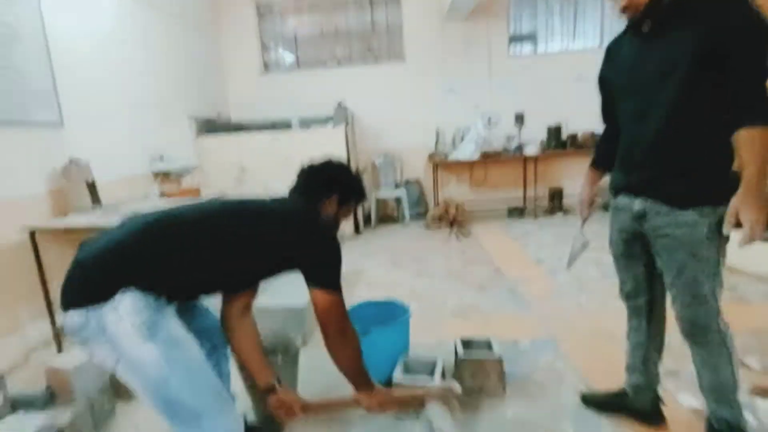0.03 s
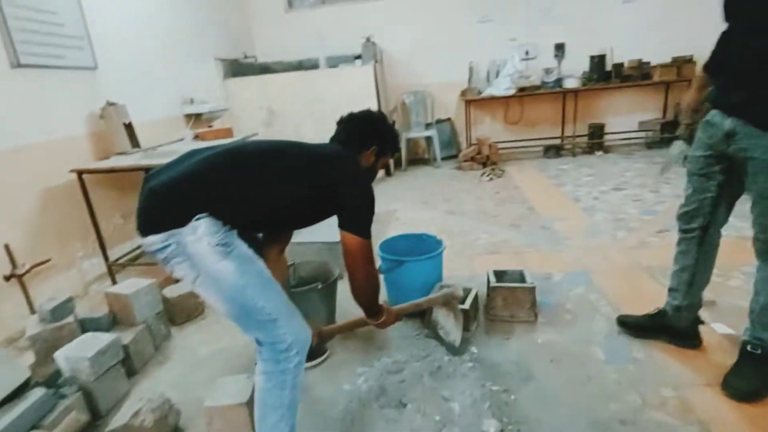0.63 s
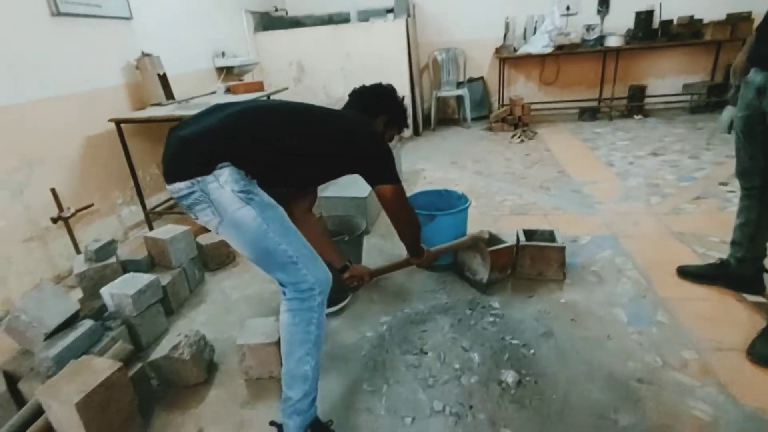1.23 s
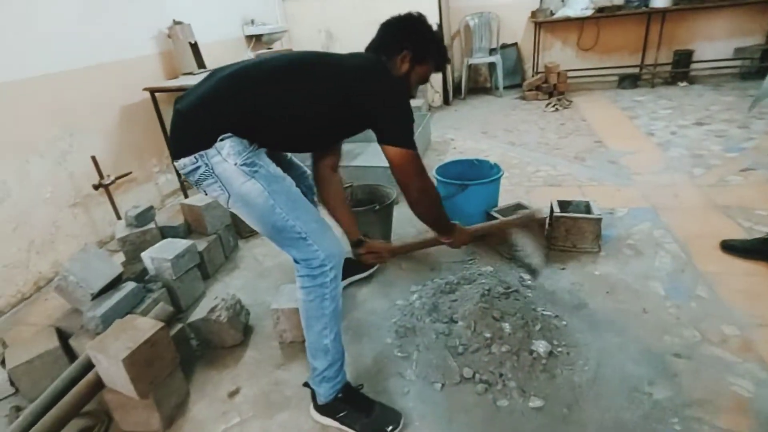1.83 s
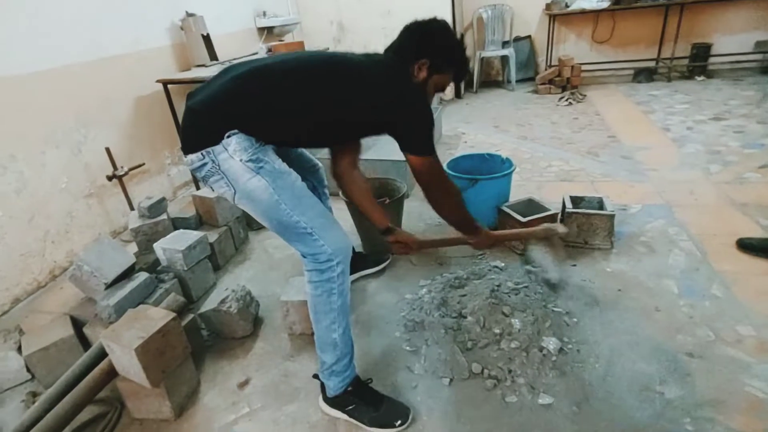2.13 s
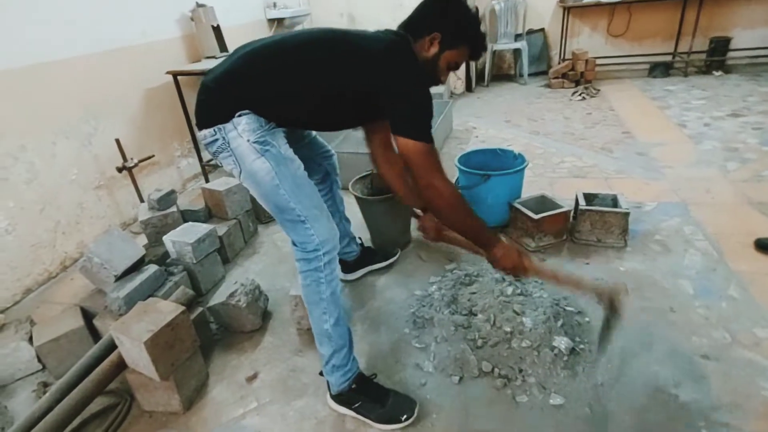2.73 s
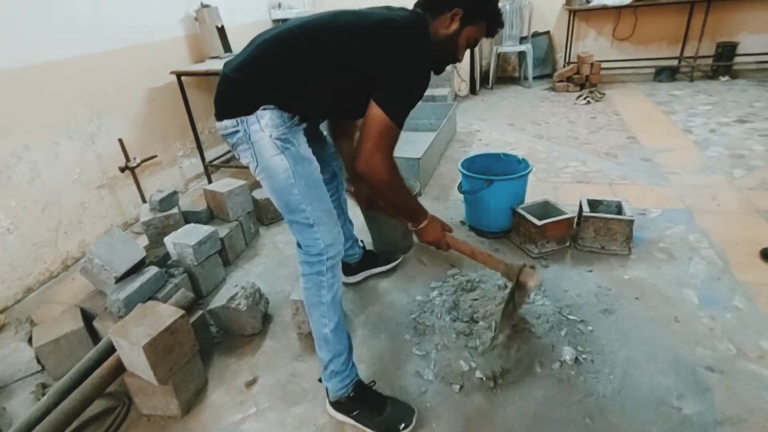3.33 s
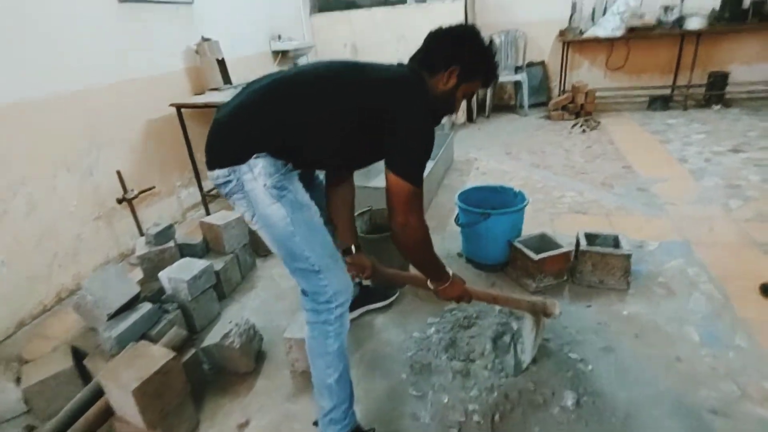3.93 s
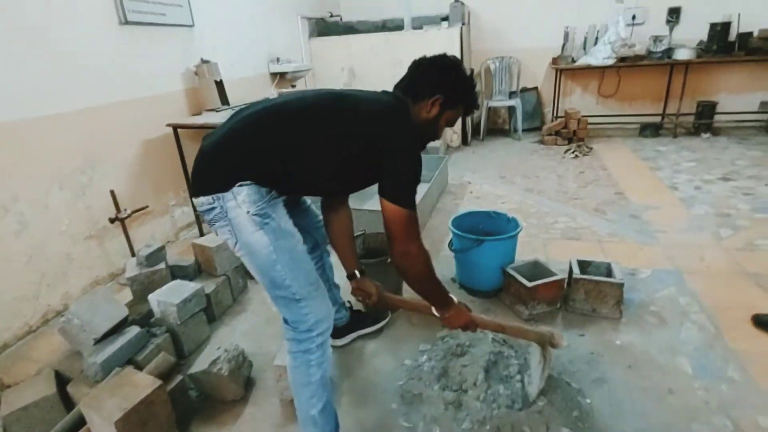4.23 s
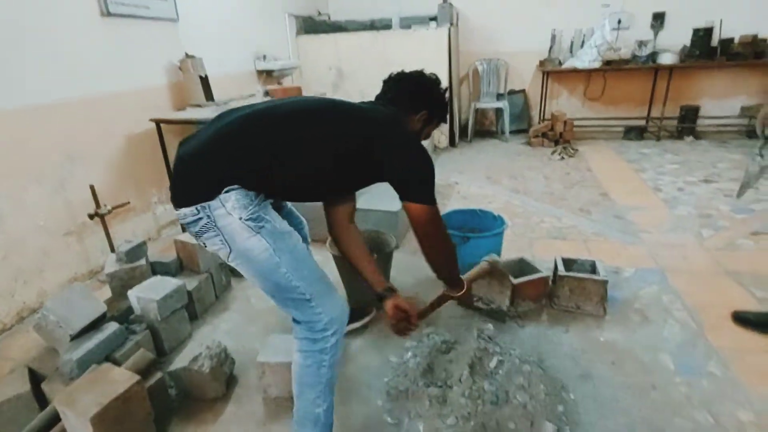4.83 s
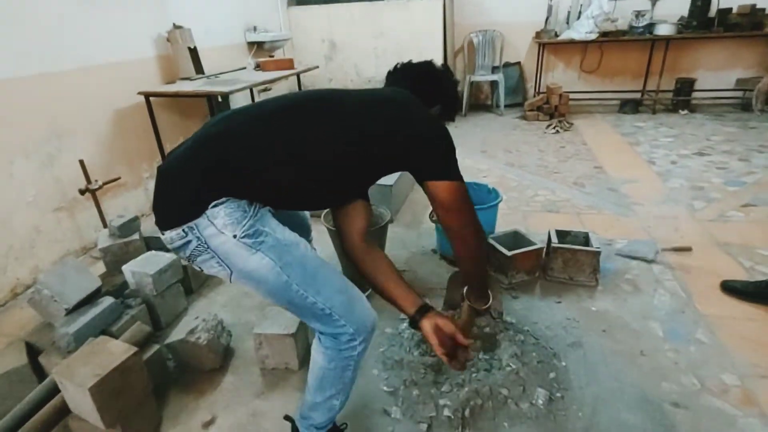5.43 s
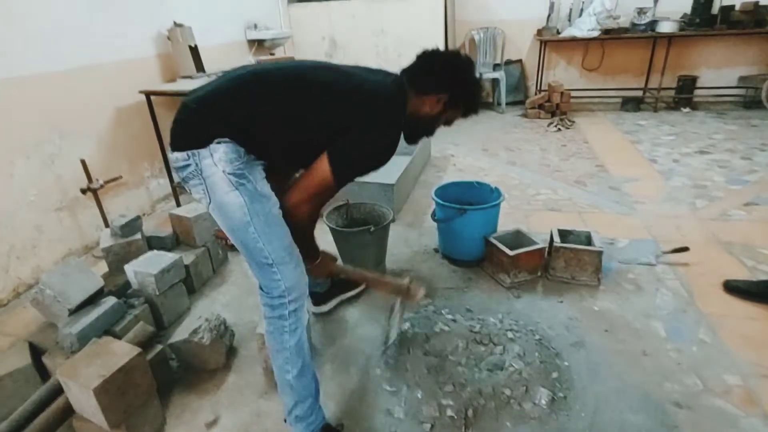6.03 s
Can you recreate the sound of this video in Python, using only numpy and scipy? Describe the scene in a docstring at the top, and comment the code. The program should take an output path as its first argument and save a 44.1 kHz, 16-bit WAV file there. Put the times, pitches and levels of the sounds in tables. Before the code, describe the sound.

A long-handled steel blade works a pile of gravel and cement on a concrete floor, each stroke a knock followed by a gritty crunch. One longer scrape comes early, then shorter strokes that grow softer, a lull, and a last strong dig. Near the end a metal trowel bounces across the floor, its plate ringing. The hard-walled room echoes around everything, over steady background noise and a faint deep rumble.

```python
"""In a bare, reverberant lab, a long-handled steel blade is struck into a heap of broken stone and
cement and dragged over the concrete floor. Each stroke knocks, then crunches as grains collide:
stones rumble, gravel rasps and sand hisses through the blade's resonances, and pinched chips chirp.
Grit slides off the lifted blade. Near the end a tossed trowel lands and skitters, its plate ringing.
A steady background noise and a faint, deep rumble lie underneath."""
import sys
import numpy as np
from scipy import signal
from scipy.fft import rfft, irfft, next_fast_len
from scipy.io import wavfile

SR = 44100
rng = np.random.default_rng(int(sys.argv[2]) if len(sys.argv) > 2 else 0)


def unload_wav(signal):
    """Save mono or channel-first audio to the path in sys.argv[1] as 16-bit WAV at rate SR, clipped to [-1, 1]."""
    wavfile.write(
        sys.argv[1],
        SR,
        np.round(np.clip(np.atleast_2d(signal).T, -1, 1) * 32767).astype(np.int16),
    )


N = 267554
LEAD = SR // 4   # samples before time zero, where the first stroke begins
TIME = np.arange(-LEAD, N) / SR
SIZE = next_fast_len(len(TIME) + 2 * SR, True)
HZ = np.maximum(np.arange(SIZE // 2 + 1) * SR / SIZE, 1)
LOW_SPLIT_HZ, HIGH_SPLIT_HZ = 700, 3500   # between the low (stones), middle (gravel), high (sand) bands
DRAG_START_S = 0.559

# strokes into the heap: (touch [s], bite [s], push length [s], skim weaker by [dB], settling [dB/s],
# stones [dB], gravel [dB], sand [dB])
DIGS = [(-0.15, -0.096, .26, -13, 99, -24, -19.5, -25), (1.627, 1.631, 0.064, 0.5, 101, -35.5, -22, -23.5),
        (2.123, 2.176, 0.1, 12.5, 130.5, -20, -15.5, -19), (2.97, 3.03, 0.057, 4, 185, -32, -22, -25),
        (3.639, 3.666, 0.11, 9, 225, -45, -35, -36), (4.997, 5.137, 0.081, 18.5, 80, -26, -17, -19.5)]
# grit sliding off the blade after the fifth stroke: one row, columns as in DIGS
SPILL = (3.96, 4.0, .04, 6, 45, -53, -52, -53)
# the trowel's impacts on the floor: (time [s], low [dB], middle [dB], high [dB], ring [dB])
BOUNCES = [(5.481, -20, -9, -11.5, -42), (5.515, -14, -4, -10.5, -37), (5.529, -34.5, -5.5, -21, -38),
           (5.562, -21, -16, -17, -44), (5.807, -13, -12.5, -9.5, -34), (5.8626, -27, -11, -7.5, -21),
           (5.878, -25, -19, -8, -26.5), (5.893, -25.5, -22, -13.5, -24), (5.911, -32, -30, -37, -40),
           (5.97, -20, -4.5, -22, -20.5), (5.985, -37, -14, -31, -28), (6.035, -23, -17, -35, -20),
           (6.055, -37, -13, -32, -39)]


def digging(strokes):
    """Source and filter: grains and knocks excite the blade, whose depth in the heap sets the colour."""
    # blade in the heap: (resonance [Hz], width [Hz], lift [dB])
    resonances = [(404, 79, -3.5), (470, 22, -6), (697, 48, 4.5), (1194, 120, 3), (1692, 15, 6),
                  (2053, 35, 6.5), (2210, 22, 2.5), (3330, 62, 3), (3650, 22, 3.5), (4010, 24, 9),
                  (4440, 120, 4.5), (4670, 90, 2), (4983, 100, 9), (6100, 110, 8), (6570, 39, 10.5),
                  (6700, 98, -16.5), (7700, 55, 3.5), (7800, 77, 4.5), (9430, 90, 6.5), (9830, 78, -11.5),
                  (10240, 52.3, 1)]
    # one spectral envelope per stroke: (frequency [Hz], level [dB])
    colours = [
        [(29, -61.5), (50, -26), (128, -11), (389, -4), (428, 4), (520, -4.5), (2560, -13.5), (2750, -14),
         (3850, -10), (5530, -15.5), (7760, -16), (16000, -28)],
        [(29, -54.5), (50, -26), (258, -10), (418, -10), (1050, -3), (1210, 1), (1400, -2.5), (1700, 1.5),
         (4900, -3), (8540, -10), (11700, -13), (16000, -26)],
        [(29, -63), (50, -31), (213, -9.5), (321, -8), (461, 0.5), (572, -8.5), (1150, -11), (1430, -12.5),
         (3100, -14), (4950, -14.5), (5500, -20), (9640, -16.5), (16000, -26.5)],
        [(29, -48), (50, -26), (85, -5.5), (495, 2.5), (615, -6.5), (884, -5.5), (997, -11), (1580, -6),
         (1870, -6.5), (3760, -9.5), (9640, 10.5), (16000, -9.5)],
        [(29, -44), (50, -21), (85, -6.5), (114, -11), (167, -1), (291, -5), (822, -12.5), (1070, -6),
         (4670, -5), (16000, -22)],
        [(29, -49), (50, -15), (75, -18), (240, -4.5), (362, -4), (450, 4), (572, -6), (1330, -4.5),
         (2270, -3.5), (2950, -2.5), (6550, -5.5), (16000, -14)],
    ]
    blade = resonance_gain(resonances)
    return sum(excite(body(colour, blade), gains, knocks_from(row[0]),
                      scrape_db=-0.5, hit_db=0.0, crush_s=0.0046)
               for row, gains, colour in zip(DIGS, strokes, colours))


def dragging(gains):
    """Sliding friction drives the blade, whose resonances shift when it is pressed on the floor."""
    # pressed blade: (resonance [Hz], width [Hz], lift [dB])
    resonances = [(300, 33, 2.5), (413, 12, 1.5), (505.3, 12, 8), (544, 29, 6.5), (590, 15, 0),
                  (789, 60, 1.5), (840, 50, 3.5), (952, 18, 4.5), (1400, 114, -5.5), (2280, 28, 6.5),
                  (2686, 80, 2.5), (3410, 25.2, 7.5), (5000, 170, 5), (6180, 200, 3.5)]
    # spectral envelope of the contact: (frequency [Hz], level [dB])
    colour = [(29, -74), (50, -23.5), (208, -12.5), (418, 4), (532, -1.5), (661, -4), (822, -1.5),
              (1070, -9), (1430, 0), (1620, -6.5), (3030, -13), (5150, -15), (11700, -24.5), (12600, -22),
              (16000, -30.5)]
    blade = body(colour, resonance_gain(resonances))
    return excite(blade, gains, knocks_from(DRAG_START_S), scrape_db=-1.0, hit_db=-2.5, crush_s=0.0036)


def spilling(gains):
    """Small impacts: falling grit excites the heap, without the blade's resonances."""
    # spectral envelope of the landing grit: (frequency [Hz], level [dB])
    colour = [(29, -39.5), (60, -13), (170, -3), (800, 4), (2400, 6), (4500, -6.5), (5400, -1.5), (6050, 1),
              (7500, -12), (11000, -19), (13000, -15), (16000, -12.5)]
    return excite(body(colour, 1), gains, knocks_from(SPILL[0]),
                  scrape_db=-0.5, hit_db=1.5, crush_s=0.0031)


def chips(sand, per_s=85, level_db=2.5, spread_db=3.5, t60_s=0.018, low_hz=3600, high_hz=13000):
    """Damped oscillation: stones pinched under the edge chirp, each at a rough pitch of its own."""
    draws = rng.random((1500, 4))
    starts = (np.cumsum(-np.log(1 - draws[:, 0])) / per_s * SR).astype(int)
    out, age = np.zeros(SIZE), np.arange(SR // 20) / SR
    decay = np.exp(-np.log(1000) * age / t60_s)
    chatter_rad = 0.76 * np.resize(drift(900), SIZE)
    for start, (_, pitch, strength, phase) in zip(starts[starts < len(TIME)], draws):
        hz = low_hz * (high_hz / low_hz) ** pitch
        span = slice(start, start + len(age))
        chip_db = level_db + spread_db * min(-np.log(1 - strength), 2)
        gain = sand[start] * from_db(chip_db) * np.sqrt(low_hz / hz)   # small stones: higher, weaker
        out[span] += gain * np.sin(2 * np.pi * (hz * age + phase) + chatter_rad[span]) * decay
    return rfft(out)


def trowel_skitter():
    """Forced vibration: impacts and sliding friction drive the trowel while it touches the floor."""
    # slides after landing: columns as in DIGS
    slides = [(5.487, 5.51, 0.054, 2, 170, -46, -21.5, -24), (5.806, 5.856, .2, 7, 100, -42.5, -49, -33.5)]
    # plate in contact: (resonance [Hz], width [Hz], lift [dB])
    resonances = [(660, 60, 3.5), (1330, 17, 2), (1700, 14, -1), (2220, 91, 3), (2570, 59, 9),
                  (3360, 320, 13), (3360, 25, -9), (4010, 130, 15.5), (4700, 15, 0), (5740, 75, 1),
                  (6130, 54, 7), (7950, 59, 1), (8420, 35, 9.5)]
    # spectral envelope of the contact: (frequency [Hz], level [dB])
    colour = [(47, -50), (80, -32.5), (422, -11.5), (482, -6.5), (1280, -8.5), (2130, -7), (2540, -3.5),
              (2840, -11), (4050, -16), (4730, -7), (9610, -12.5), (10500, -10.5), (16000, -26)]
    plate = body(colour, resonance_gain(resonances))
    return excite(plate, sum(map(stroke_gains, slides)), BOUNCES,
                  scrape_db=0.0, hit_db=1.0, crush_s=0.0025)


def trowel_ring():
    """Free vibration: each bounce sets the plate ringing; a dull contact leaves the upper modes weak."""
    # modes of the thin plate: (frequency [Hz], level [dB], t60 [s])
    modes = [(2570, 3.5, 0.36), (2336, -6, 0.26), (2420, -8, .25), (3300, -19, .25), (4015, -10, .2),
             (5717, -18, 0.16), (6160, -26, .2), (7822, -13, .12), (8250, -19, .12), (10210, -9, .12),
             (10660, -13, 0.11), (13330, -26, .08)]
    out, age = np.zeros(SIZE), np.arange(SR) / SR
    for time_s, _, middle_db, high_db, ring_db in BOUNCES:
        start = LEAD + round(time_s * SR)
        for hz, mode_db, t60_s in modes:
            brightness_db = 1.5 * (high_db - middle_db) * (hz > HIGH_SPLIT_HZ)
            swing = np.sin(2 * np.pi * (hz * age + rng.random())) * np.exp(-np.log(1000) * age / t60_s)
            out[start:start + SR] += from_db(ring_db + mode_db + brightness_db) * swing
    return rfft(out)


def stroke_gains(row):
    """Grain inertia: through skim, bite, push and settling, heavy grains start and stop later."""
    touch_s, bite_s, push_s, skim_db, settle_db_per_s, *levels_db = row
    attacks_s, rolls_s = (0.028, 0.0093, 0.0058), (0.039, 0.005, 0.0024)   # stones, gravel, sand
    since_bite = TIME - bite_s
    gains = []
    for level_db, attack_s, roll_s in zip(levels_db, attacks_s, rolls_s):
        skimming = np.clip(1 - since_bite / attack_s, 0, 1)
        settling_s = np.maximum(since_bite - push_s - roll_s, 0)
        gains.append(from_db(level_db - skim_db * skimming - settle_db_per_s * settling_s))
    return np.array(gains) * (TIME >= touch_s)


def drag_gains():
    """Friction noise: stones and gravel follow a power of the force; sand has a level of its own."""
    # scraping force of the blade pulled flat over the floor: (time [s], level [dB])
    force = [(0.6, -24), (0.67, -21.5), (0.684, -16.5), (0.704, -23), (0.866, -12.5), (1.204, -22.5),
             (1.206, -20.5), (1.61, -31)]
    # hiss of the sand: (time [s], level [dB])
    hiss = [(0.6, -27.5), (0.832, -30.5), (0.884, -24.5), (0.978, -31), (1.002, -22), (1.144, -40.5),
            (1.212, -22.5), (1.362, -24), (1.39, -36), (1.61, -43)]
    # stones, then gravel: (level at 0 dB of force [dB], slope [dB/dB])
    force_laws = [(-2.5, 1.08), (2, 1.08)]
    force_db, hiss_db = (np.interp(TIME, *np.transpose(curve)) for curve in (force, hiss))
    levels_db = [db + slope * force_db for db, slope in force_laws] + [hiss_db]
    return from_db(levels_db) * (TIME >= DRAG_START_S) * (TIME < force[-1][0])


def knocks_from(start_s):
    """The impacts between this move of the blade and its next one."""
    # blade, or falling grit, on stone or floor: (time [s], low [dB], middle [dB], high [dB])
    knocks = [(0.0154, -9.5, -18, -4), (0.035, -32.5, -6.5, -3.5), (0.058, -40, -14, -2),
              (0.099, -13, -13, -14), (0.559, -14.5, -0.5, -25), (0.68, -14.5, -21, -17),
              (0.738, -20.5, -6, -21), (0.874, -20, -9.5, -11), (0.988, -4, -22, -6.5),
              (1.206, -38, -7.5, -14), (1.222, -18.5, -3.5, -12.5), (1.2774, -30.5, -2.5, -10.5),
              (1.483, -27, -7.5, -20.5), (1.6267, -26, -8, -7), (1.683, -35.5, -31, -3),
              (1.7, -18, -6, -37), (2.127, -19.5, -19, -19.5), (2.18, -22, -22, -15),
              (2.219, -21, -16, -12), (2.24, -11, -9, -7), (2.301, -26.5, -33, -22.5),
              (2.334, -35, -6, -22.5), (2.9775, -23, -13, -10.5), (3.072, -33, -29, -13),
              (3.092, -14, -13.5, -40), (3.122, -19, -10, -29), (3.666, -33, -21, -34),
              (3.9999, -37, -49, -36), (4.2847, -54, -32.5, -42), (5.0043, -25, -23, -20.5),
              (5.141, -13.5, -13, -16.5)]
    moves_s = [row[0] for row in DIGS + [SPILL]] + [DRAG_START_S, np.inf]
    end_s = min(s for s in moves_s if s > start_s)
    return [row for row in knocks if start_s <= row[0] + .01 < end_s]


def crunch(band):
    """Shot noise: the unit-power force of one size of grain colliding at random, in uneven slips."""
    # stones, gravel, sand: (collision rate [1/s], spread of sizes [dB], stick-slip unevenness [dB])
    grains = [(912, 0.5, 1.5), (1757, 3, 6.5), (3920, 1.5, 7.5)]
    per_s, spread_db, uneven_db = grains[band]
    force, slips = np.zeros(len(TIME)), drift(90)
    chance, size = rng.random((2, len(TIME)))
    hits = np.flatnonzero(chance < per_s / SR)
    sizes_db = spread_db * np.minimum(-np.log(1 - size[hits]), 4) + uneven_db * slips[hits]
    force[hits] = from_db(sizes_db) * (-1.0) ** hits   # pushes and pulls alike
    return rms_one(force)


def blows(hits, band, crush_s):
    """Inelastic impact: each contact crushes grit, so its force is a decaying burst of noise."""
    force, age = np.zeros(SIZE), np.arange(SR // 30) / SR
    for time_s, *levels_db in hits:
        start = LEAD + round(time_s * SR)
        burst = np.exp(-age / crush_s) * rng.standard_normal(len(age))
        force[start:start + len(age)] += from_db(levels_db[band]) * burst
    return force[:len(TIME)]


def excite(responses, gains, hits, scrape_db, hit_db, crush_s):
    """Linear response: the spectrum of a body driven by scraping and impact forces in three bands."""
    spectrum = 0
    for band, (gain, response) in enumerate(zip(gains, responses)):
        scrape = from_db(scrape_db) * gain * crunch(band)
        impacts = from_db(hit_db) * blows(hits, band, crush_s)
        spectrum += rfft(scrape + impacts, SIZE) * response
    return spectrum


def resonance_gain(resonances):
    """Resonance: Lorentzian peaks and dips add in power to give a gain over frequency."""
    lift = sum((from_db(db) ** 2 - 1) / (1 + (2 * (HZ - hz) / width) ** 2)
               for hz, width, db in resonances)
    return np.sqrt(np.maximum(1 + lift, .1))


def body(colour, resonance):
    """Transfer functions of an object in the low, middle and high bands, each of unit power."""
    gain = from_db(at_hz(colour, HZ)) * resonance
    under_low, under_high = (1 / (1 + (HZ / hz) ** 8) for hz in (LOW_SPLIT_HZ, HIGH_SPLIT_HZ))
    shares = under_low, (1 - under_low) * under_high, 1 - under_high
    return [minimum_phase(rms_one(gain * np.sqrt(share))) for share in shares]


def minimum_phase(gain):
    """Causality: a response with this gain that rings only after it is struck."""
    cepstrum = irfft(np.log(gain + 1e-7), SIZE)
    cepstrum[1:SIZE // 2] *= 2
    cepstrum[SIZE // 2 + 1:] = 0
    return np.exp(rfft(cepstrum))


def lab(direct_db, tail_db, left_lag_s, left_louder_db, wall_s=.0052, wall_db=-12.0):
    """Multipath propagation: direct sound, a reflection off the near wall, and the reverberant tail."""
    direct_delays_s = np.array([[left_lag_s], [0]])
    wall_delays_s = np.array([[wall_s], [wall_s + 2 * left_lag_s]])
    direct = from_db(direct_db) * np.exp(-2j * np.pi * HZ * direct_delays_s)
    reflection = from_db(wall_db) * np.exp(-2j * np.pi * HZ * wall_delays_s)
    balance = from_db([[left_louder_db / 2], [-left_louder_db / 2]])
    return (direct + reflection + from_db(tail_db) * room_tail()) * balance


def room_tail(build_s=0.001):
    """Reverberation: a diffuse field decays exponentially, the treble first."""
    # reverberation time: (frequency [Hz], t60 [s])
    decay_times = [(100, 1.3), (250, 1.43), (500, 1.47), (1000, 1.25), (2000, 1.13), (4000, 0.82),
                   (6000, 0.7), (9000, 0.52), (14000, 0.42)]
    noise = irfft(diffuse_field(), SIZE)[:, :2 * SR]
    hz, age, frames = signal.stft(noise, SR, nperseg=512)
    rate = np.log(1000) / at_hz(decay_times, np.maximum(hz, 1))[:, None]
    tail = signal.istft(frames * np.exp(-rate * age) * np.sqrt(2 * rate / SR), SR)[1]
    build_up = 1 - np.exp(-np.arange(tail.shape[1]) / SR / build_s)
    return rfft(tail * build_up, SIZE)


def diffuse_field():
    """Spatial coherence: white noise from all sides is alike at two points only in the bass."""
    # likeness of left and right: (frequency [Hz], correlation [-])
    coherence = [(60, 1), (125, 0.91), (250, 0.94), (500, 0.57), (1000, -0.053), (2000, 0.1),
                 (4000, -0.059), (12000, 0.0068)]
    mid, side = rfft(rng.standard_normal((2, SIZE)))
    alike = np.clip(at_hz(coherence, HZ), -.99, .99)
    return np.sqrt((1 + alike) / 2) * mid + np.sqrt((1 - alike) / 2) * side * [[1], [-1]]


def room_noise(level_db=-46.5):
    """Stationary noise: the room's background is a diffuse field, strongest in the bass."""
    # spectral density: (frequency [Hz], level [dB])
    colour = [(18, -33), (30, -31), (53, -12), (76, -10), (119, -9), (154, -11), (190, -6.5), (274, -11),
              (337, -10), (629, -17), (905, -14), (1410, -22), (1520, -17.5), (3590, -38), (15000, -63)]
    return from_db(level_db) * rms_one(from_db(at_hz(colour, HZ))) * diffuse_field()


def rumble(centre_hz=44, width_hz=14, gain_db=-8.5):
    """Narrow-band noise: a deep rumble that swells and fades, the same left and right."""
    # envelope of the rumble: (time [s], level [dB])
    envelope = [(0.0, -57), (0.2, -67), (3.97, -74), (4.04, -53), (4.46, -63), (4.53, -47.5), (6.07, -59)]
    band = 1 / (1 + (2 * (HZ - centre_hz) / width_hz) ** 2)
    noise = rms_one(irfft(band * rfft(rng.standard_normal(SIZE)), SIZE)[:N])
    return noise * from_db(gain_db + np.interp(TIME[LEAD:], *np.transpose(envelope)))


def from_db(db):
    """Decibels to amplitude ratio."""
    return np.exp(np.log(10) / 20 * np.asarray(db))


def rms_one(x):
    """Normalisation to unit power."""
    return x / np.sqrt(np.mean(np.abs(x) ** 2) + 1e-20)


def at_hz(points, hz):
    """Interpolation on a log-frequency axis."""
    knots_hz, values = np.transpose(points)
    return np.interp(np.log(hz), np.log(knots_hz), values)


def drift(per_s):
    """Random fluctuation: straight lines between Gaussian values, per_s of them a second."""
    knots = rng.standard_normal(4000)
    return np.interp((TIME - TIME[0]) * per_s, np.arange(len(knots)), knots)


def scene():
    """Superposition: blade, chips and trowel sound from their places in the room, over its background."""
    strokes = [stroke_gains(row) for row in DIGS]
    spill, drag = stroke_gains(SPILL), drag_gains()
    _, _, sand = sum(strokes) + spill + drag
    blade_work = digging(strokes) + spilling(spill) + dragging(drag)
    trowel = trowel_skitter() + trowel_ring()
    at_heap = blade_work * lab(direct_db=-4.5, tail_db=-0.5, left_lag_s=148.7e-6, left_louder_db=0.4)
    at_edge = chips(sand) * lab(direct_db=-5.0, tail_db=2.5, left_lag_s=160e-6, left_louder_db=4)
    on_floor = trowel * lab(direct_db=-5.0, tail_db=1.5, left_lag_s=92e-6, left_louder_db=0.6)
    spectrum = at_heap + at_edge + on_floor + room_noise()
    return irfft(spectrum, SIZE)[:, LEAD:LEAD + N] + rumble()


def record(dry, low_cut_hz=36, high_cut_hz=16200):
    """Band limiting and soft saturation: deepest bass and top treble are cut, and peaks are rounded."""
    thinned = signal.sosfilt(signal.butter(4, low_cut_hz, "high", fs=SR, output="sos"), dry)
    rounded = 1.447 * np.tanh(thinned / 1.552)
    return signal.sosfilt(signal.ellip(10, .2, 80, high_cut_hz, fs=SR, output="sos"), rounded)


dry = scene()
out = record(dry)
unload_wav(out)
```